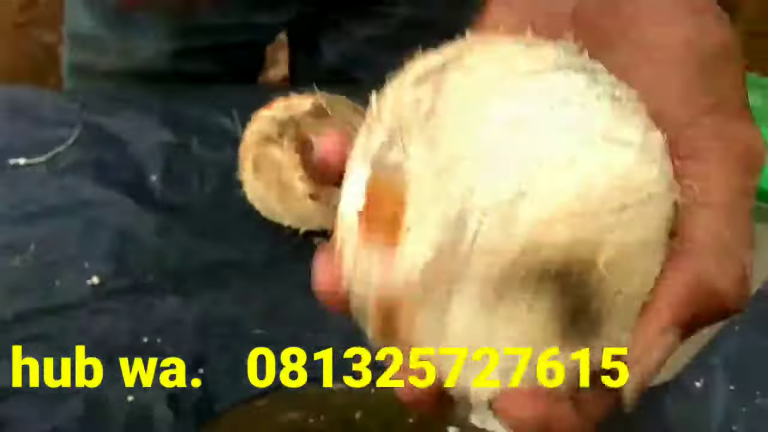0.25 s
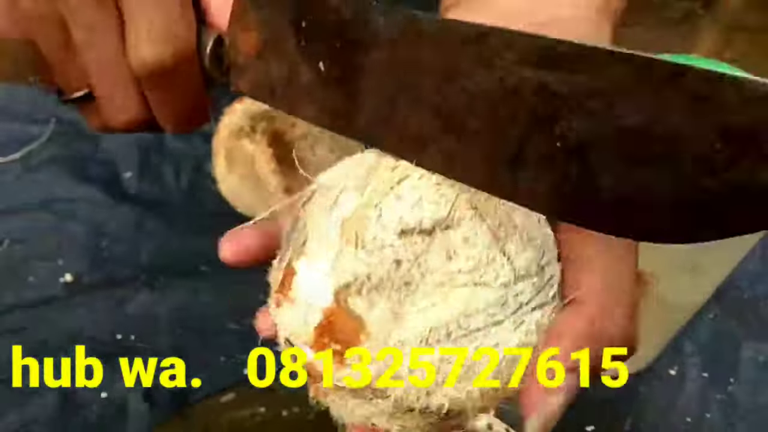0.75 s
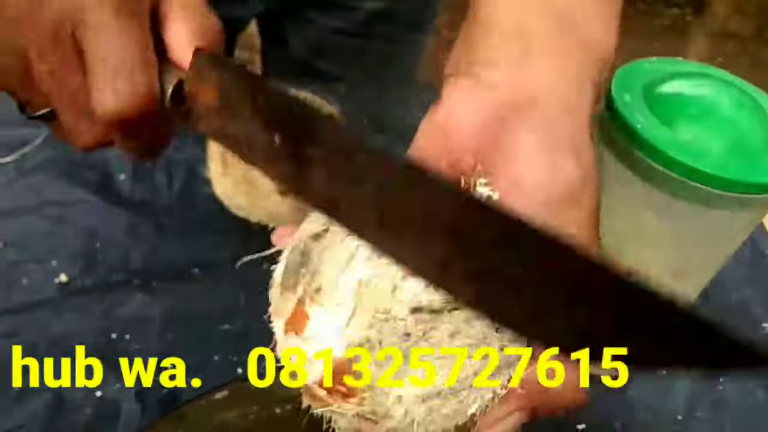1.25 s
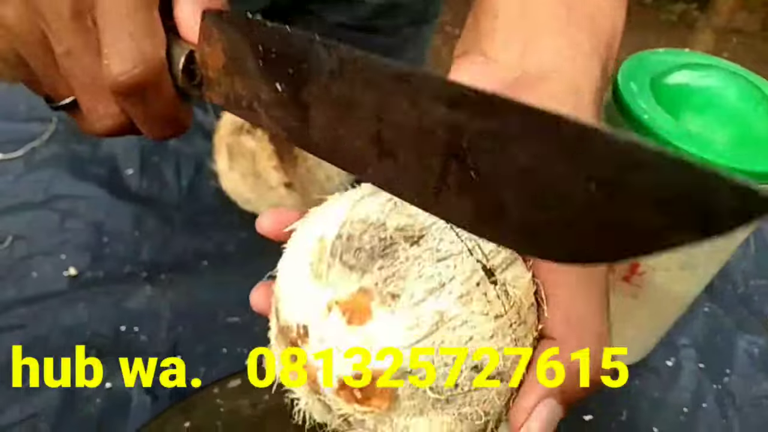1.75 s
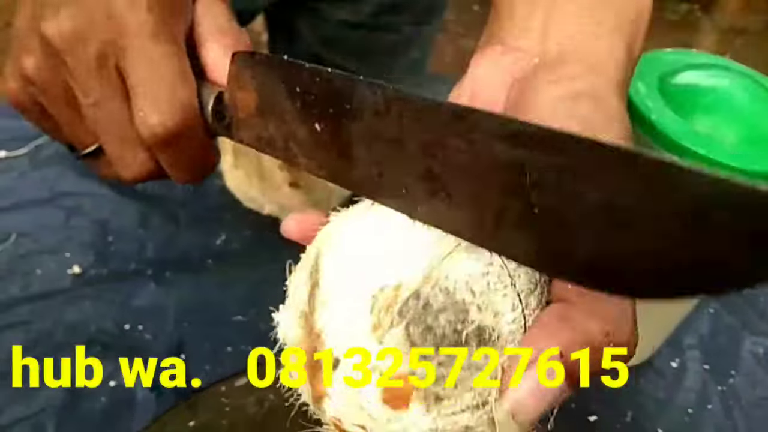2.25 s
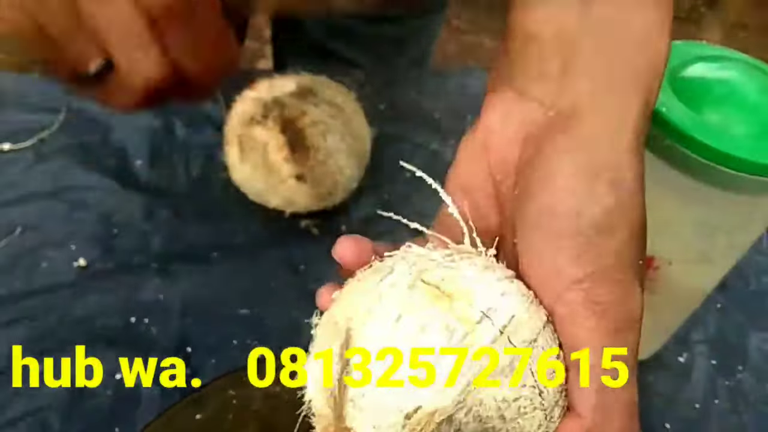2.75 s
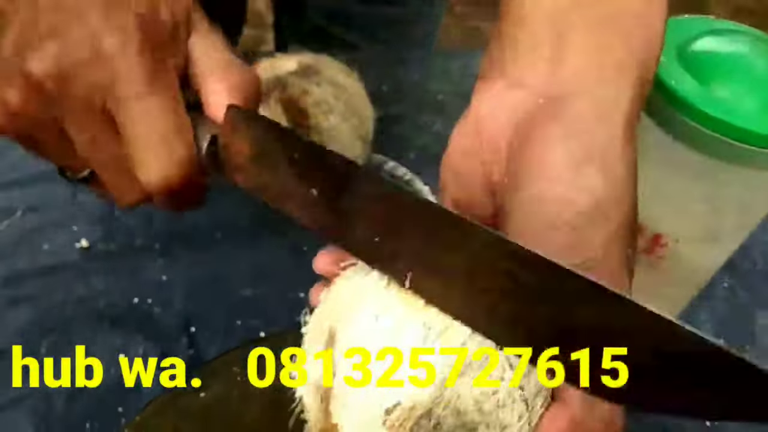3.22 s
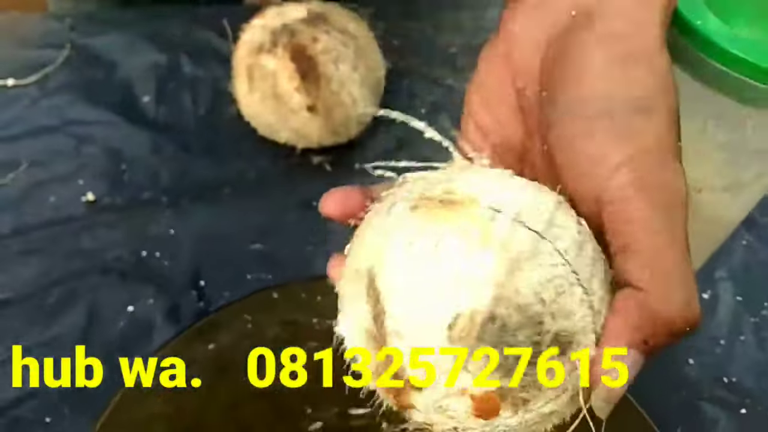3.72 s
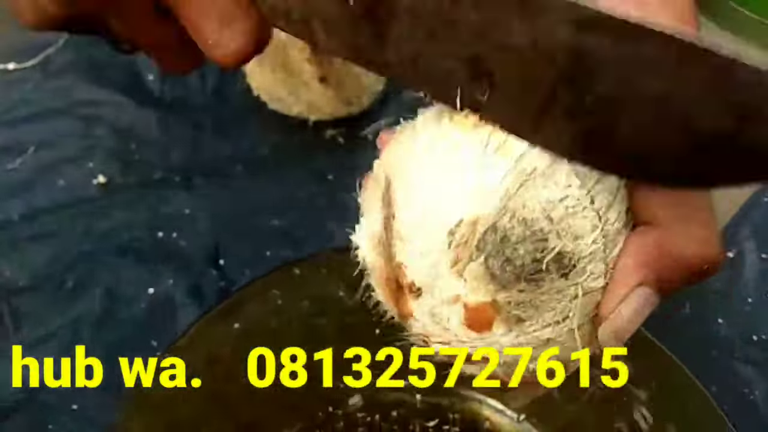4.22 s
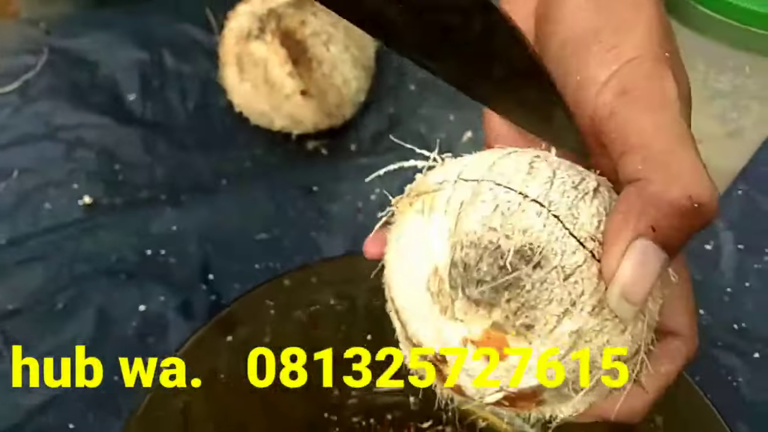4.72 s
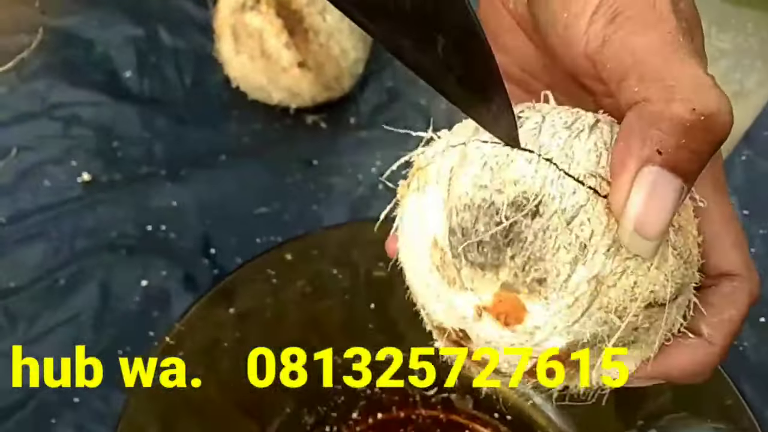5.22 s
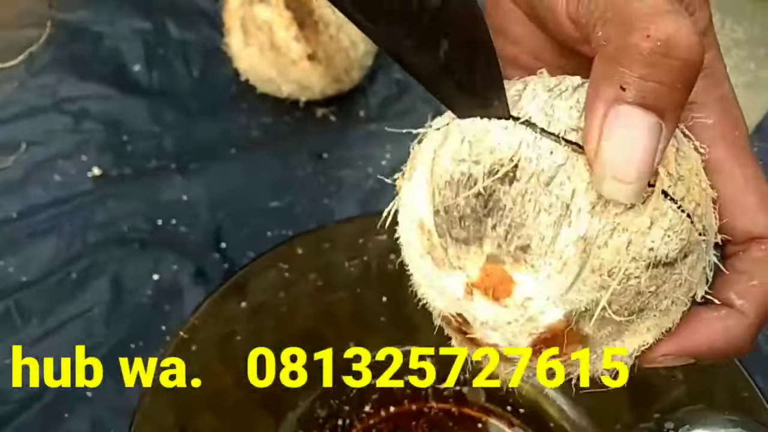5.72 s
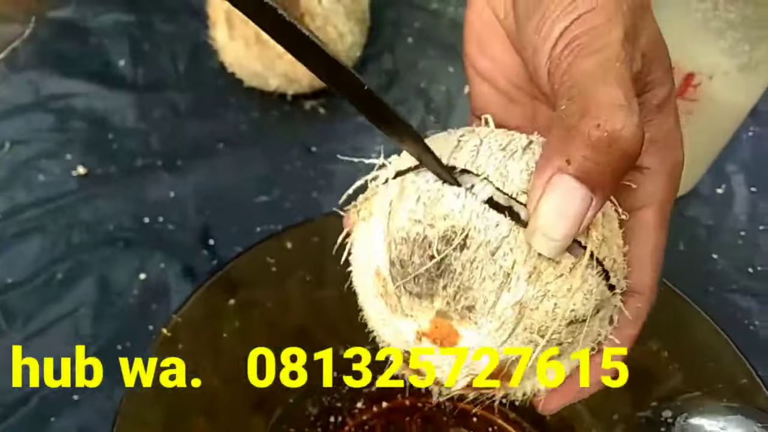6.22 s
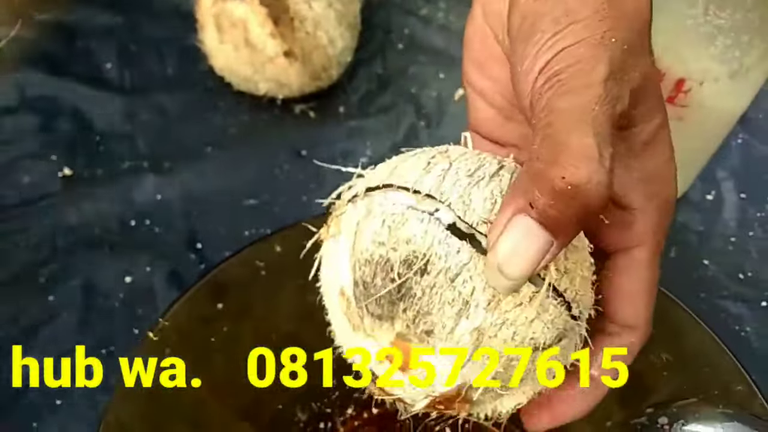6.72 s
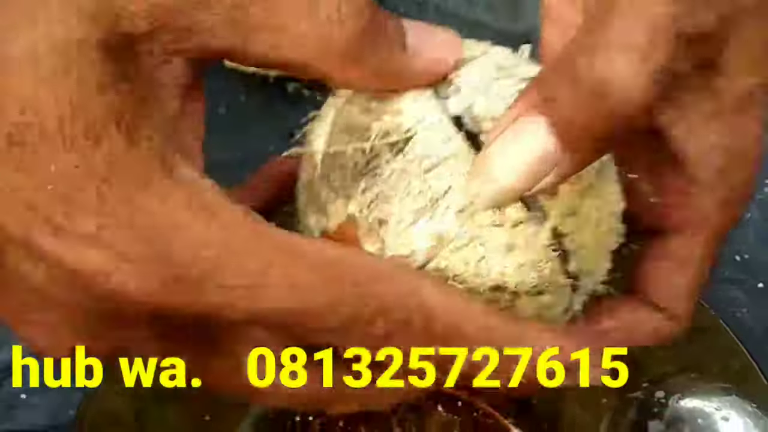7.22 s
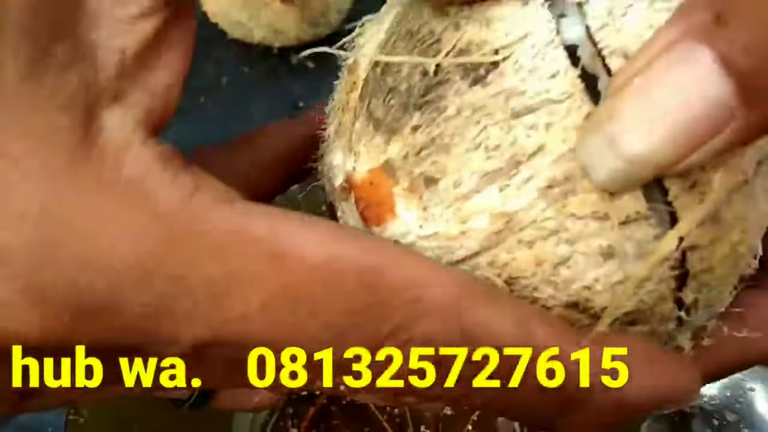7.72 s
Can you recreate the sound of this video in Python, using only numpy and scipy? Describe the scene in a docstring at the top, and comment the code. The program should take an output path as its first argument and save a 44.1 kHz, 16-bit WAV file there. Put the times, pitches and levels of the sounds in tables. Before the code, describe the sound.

A quiet open yard with low distant traffic, soft hiss and very faint wavering whistles. Close by, a machete knocks a husked coconut: a sharp crack at 0.1 seconds, a very loud, hollow one with ringing metal and yard echo at 0.45, a faint touch at 0.9, another huge blow at 1.3. A tiny metal chink follows at 1.46, with soft taps near 1.95 and 2.3. A quicker run of strong knocks comes at 2.75, 3.05 and 3.35, a last one at 4.35. The loudest distort slightly. From 5 to 6.4 dry fibres scratch, tick and rustle as the tip pries the crack. At 6.45 the shell gives a hollow double pop, then a short resonant grind to 6.7. At 7.0 the dropped blade thumps, slides with a bright, shrill metallic scrape and jingle, bounces at 7.2 and 7.5, and leaves faint rustling and yard rumble until 8.

```python
"""Sharp knocks ring out over a quiet yard: the back of a machete strikes a hand-held husked coconut. Each knock
is splintering noise, a hollow thud and ringing blade modes, with a noise tail from the yard. Fibre grains
rustle as the shell is turned and prised open; a small metal part chinks once early on; the dropped blade slides
and bounces. Two close microphones clip softly, and four loud blows swing their bias. Filtered noise makes
distant traffic; wavering tones and gliding whistles lie faintly behind."""
import sys
import numpy as np
from scipy import signal
from scipy.fft import rfft, irfft
from scipy.io import wavfile

SR = 44100
rng = np.random.default_rng(int(sys.argv[2]) if len(sys.argv) > 2 else 0)


def write(x):
    x = np.atleast_2d(x).T
    wavfile.write(sys.argv[1], SR, np.round(np.clip(x, -1, 1) * 32767).astype(np.int16))

N = 351036  # length in samples


def amp(db):
    """dB to gain."""
    return 10 ** (np.asarray(db) / 20)


def sides(pan_db):
    """Left and right gains whose mean is 1; positive pan_db leans left."""
    left = amp(pan_db)
    return np.array([[left], [1.]]) * 2 / (1 + left)


def rms_one(x):
    """Scale so that the mean of the channels has rms 1."""
    middle = np.mean(np.atleast_2d(x), axis=0)
    return x / np.sqrt(np.mean(middle ** 2) + 1e-20)


def in_time(rows):
    """Level columns as gains in time, silent outside the table's span."""
    start_s, *columns = np.transpose(rows)
    t = np.arange(N) / SR
    return [amp(np.interp(t, start_s, level_db, -200, -200)) for level_db in columns]


def at_hz(points, hz):
    """Read a table on a log-frequency axis."""
    table_hz, values = np.array(points)[:, 0], np.array(points)[:, 1]
    return np.interp(np.log(hz), np.log(np.maximum(table_hz, 1)), values)


def drift(rate):
    """Slow chance: random points, rate per second, of spread 1, joined by straight lines."""
    steps = rng.standard_normal(int(N / SR * rate) + 2)
    return np.interp(np.arange(N) / SR * rate, np.arange(len(steps)), steps)


# Likeness of the two microphones' noise, 1 alike to -1 opposed: pitch_hz [Hz], likeness [-1..1]
MIC_LIKENESS = [(60, 0.92), (240, 0.92), (950, 0.25), (3770, -0.0013), (15000, -0.71)]


def coloured(spectrum, pan, size=N, source=None):
    """Stereo noise with a spectrum, alike in the bass and partly opposed at the top; rms 1."""
    hz = np.maximum(np.fft.rfftfreq(size, 1 / SR), 1)
    mid, side = rfft(rng.standard_normal((2, size)) if source is None else source)
    alike = np.clip(at_hz(MIC_LIKENESS, hz), -1, 1)
    tilt = amp(at_hz(pan, hz) / 2)
    mid, side = mid * np.sqrt(1 + alike), side * np.sqrt(1 - alike)
    pair = np.array([(mid + side) * tilt, (mid - side) / tilt])
    return rms_one(irfft(amp(at_hz(spectrum, hz)) * pair, size))


def grains(per_s, spread_db):
    """Two rows of random clicks of uneven size."""
    loudness_db = spread_db * np.minimum(rng.exponential(1, (2, N)), 4)
    sizes = amp(loudness_db) * rng.standard_normal((2, N))
    return sizes * (rng.random((2, N)) < per_s / SR) + 1e-18


def resonate(x, peaks):
    """Parallel two-pole resonances of alternating sign, each with gain 1 on top before its level."""
    out = 0
    for k, (hz, width_hz, level_db) in enumerate(peaks):
        r = np.exp(-np.pi * width_hz / SR)
        poles = [1, -2 * r * np.cos(2 * np.pi * hz / SR), r * r]
        zeros = [(1 - r * r) / 2, 0, (r * r - 1) / 2]
        out = out + (-1) ** k * amp(level_db) * signal.lfilter(zeros, poles, x)
    return out


def rings(modes, level_db, t):
    """Struck modes with chance strengths; a plate radiates with unlike phases to each side."""
    hz, mode_db, t60_s = np.transpose(modes)[:, :, None]
    strength_db = level_db + mode_db + rng.normal(0, 2, hz.shape)
    phases = rng.uniform(0, 2 * np.pi, (2, *hz.shape))
    decay = amp(strength_db - 60 * t / t60_s)
    return (decay * np.sin(2 * np.pi * hz * t + phases)).sum(axis=1)


FALL_POWER = 1.4  # 2 = bell-shaped fall, 1 = long tail


def swell(loudest_s, rise_s, fall_s):
    """A gain that is loudest at one moment: bell-shaped rise, trailing fall."""
    t = np.arange(0, N, 32) / SR
    rising = ((t - loudest_s) / rise_s) ** 2
    falling = (abs(t - loudest_s) / fall_s) ** FALL_POWER
    gain = np.exp(-np.where(t < loudest_s, rising, falling))
    return np.interp(np.arange(N) / SR, t, gain)


# Colour of the open yard and far traffic: pitch_hz [Hz], level_db [relative dB per Hz]
YARD_COLOUR = [(12, -47), (20, -13), (37, -2), (113, -4.5), (270, -23.5), (301, -16), (328, -27.5),
               (513, -25.5), (660, -25), (738, -35), (897, -24), (1090, -34.5), (2080, -34.5),
               (4200, -32.5), (6500, -41), (10500, -30.5), (13500, -33.5), (16000, -37)]
# Where the yard lies between the microphones: pitch_hz [Hz], pan_db [left-right dB]
YARD_PAN = [(60, 0), (240, -0.5), (950, -0.5), (3770, -6), (15000, 0)]
# Far tones: pitch_hz [Hz], level_db [dB before FAR_LIFT_DB]
FAR_TONES = [(299, -74.5), (500, -78), (860, -78)]
# Faint far whistles: start_s, end_s [s], start_hz, end_hz [Hz], level_db [dB before FAR_LIFT_DB]
FAR_WHISTLES = [(0.204, 0.464, 6260, 6430, -71), (1.094, 1.28, 6320, 6100, -79),
                (1.803, 2.253, 5780, 5750, -75.5), (4.88, 5.096, 1476, 1370, -66),
                (5.18, 5.414, 1428, 1276, -70.5), (6.863, 6.949, 1257, 1077, -61),
                (6.879, 6.916, 2440, 2190, -65), (7.579, 7.716, 594, 627, -60.5)]
YARD_DB, FAR_LIFT_DB = -52, 1.5


def yard():
    """Far traffic rumble and hiss as shaped noise, with wavering tones and faint gliding whistles."""
    t = np.arange(N) / SR
    out = amp(YARD_DB + 0.93 * drift(1.0)) * coloured(YARD_COLOUR, YARD_PAN)
    for hz, level_db in FAR_TONES:
        out += amp(level_db + FAR_LIFT_DB + 3.4 * drift(12.0)) * np.sin(2 * np.pi * hz * t)
    for start_s, end_s, start_hz, end_hz, level_db in FAR_WHISTLES:
        arch = np.sin(np.pi * np.clip((t - start_s) / (end_s - start_s), 0, 1)) ** .5
        glide_hz = np.interp(t, [start_s, end_s], [start_hz, end_hz])
        pitch_hz = glide_hz * (1 + 0.0064 * drift(22))
        gain = amp(level_db + FAR_LIFT_DB + 3.0 * drift(28)) * arch
        out += gain * np.sin(2 * np.pi * np.cumsum(pitch_hz) / SR)
    return out


# Close scuffs of hands and blade tip on the fibres:
# loudest_s, rise_s, fall_s [s], hiss_db [dB], dull_db [dB relative to the hiss]
SCUFFS = [(.01, 0.03, 0.021, -60, -14), (1.011, 0.051, 0.043, -58.5, -19), (1.74, .032, .054, -61.5, -5),
          (1.96, .005, .012, -55.5, -9.5), (2.149, .019, 0.048, -60.5, -16), (2.33, .03, .018, -59, -12.5),
          (2.459, .017, 0.0088, -59.5, -11), (3.0, .02, 0.02, -62.5, -15.5), (3.6, 0.078, 0.071, -59, -29),
          (3.871, .14, 0.12, -60.5, -11), (4.521, .038, 0.12, -57, -16.5), (4.75, 0.11, 0.2, -62, -12),
          (5.133, 0.019, 0.016, -59, -7), (5.2, .029, 0.038, -55, -15), (5.281, 0.014, 0.015, -58, -13),
          (5.386, 0.011, 0.05, -40, -21), (5.61, 0.076, 0.059, -61.5, -15), (5.712, .04, 0.02, -44, -3),
          (5.858, .01, 0.031, -46, -30.5), (6.001, 0.064, .046, -59, -19), (6.07, 0.05, 0.029, -52, -19),
          (6.151, .034, 0.045, -53.5, -17.5), (6.24, 0.038, .031, -54.5, -15),
          (6.381, 0.063, 0.2, -62, -12), (6.611, 0.045, 0.023, -45.5, -10), (6.7, 0.039, .1, -62, -3),
          (6.891, .019, 0.067, -58, -4.5), (7.68, 0.12, 0.21, -66, -1)]
# Colour of the bright fibres: pitch_hz [Hz], level_db [relative dB per Hz]
RUSTLE_HISS = [(880, -59), (1500, -20), (2040, -14), (2940, -4), (6060, -8), (6830, -7.5), (10900, 6.5),
               (14900, -5), (16000, -12)]
# Colour of the gripped shell: pitch_hz [Hz], level_db [relative dB per Hz]
RUSTLE_DULL = [(120, -32.5), (200, -22.5), (730, -5.5), (2310, -25), (3810, -11), (6000, -30),
               (7800, -72.5), (13200, -120)]


def rustle():
    """Dense fibre grains in short swells, with a duller noise part when the shell is gripped."""
    hiss, dull = sum(amp([[hiss_db], [hiss_db + dull_db]]) * swell(*shape)
                     for *shape, hiss_db, dull_db in SCUFFS)
    bright = coloured(RUSTLE_HISS, YARD_PAN, source=grains(5400, spread_db=2.5))
    flicker = amp(2.1 * drift(48))
    return flicker * (hiss * bright + dull * coloured(RUSTLE_DULL, YARD_PAN))


# The opened shell grinds close by: start_s [s], level_db [dB]
GRIND_LEVEL = [(6.48, -57), (6.54, -60), (6.57, -46.5), (6.615, -37), (6.632, -67), (6.675, -53),
               (6.7, -76)]
MOUTH_HZ, MOUTH_WIDTH_HZ = 1030, 70


def grind():
    """Shell edges slip in random clicks and excite the air in the open mouth."""
    slips = grains(1500, spread_db=1.0)[0]
    mouth = [(MOUTH_HZ, MOUTH_WIDTH_HZ, 0), (3450, 150, -6), (4500, 300, -12)]
    hum = rms_one(resonate(slips, mouth))
    return in_time(GRIND_LEVEL)[0] * hum * sides(-13.5)


# Surges of the sliding blade: start_s [s], level_db [dB of its high ring]
SLIDE_SURGES = [(7.03, -57), (7.046, -30.5), (7.094, -23.5), (7.15, -26), (7.196, -56), (7.21, -30),
                (7.25, -32.5), (7.258, -23.5), (7.28, -25), (7.3, -45), (7.314, -32), (7.382, -50),
                (7.39, -37.5), (7.46, -60.5), (7.494, -44), (7.55, -82)]
# High blade resonances: pitch_hz, width_hz [Hz], level_db [relative dB]
SLIDE_RING = [(9000, 100, -2), (9370, 110, 0), (9610, 78, 4), (10400, 150, -4), (10730, 75, 0.5),
              (11200, 140, -1.5), (11770, 130, -6), (12700, 120, -10.5)]
# Colour of the lower scrape: pitch_hz [Hz], level_db [relative dB per Hz]
SLIDE_MID = [(300, -30), (600, 2), (1500, 4), (3000, 12.5), (4800, 6), (5800, -17), (8000, 5.5),
             (9000, -58)]
# Singing notes, each filter passed twice: pitch_hz, width_hz [Hz, one pass], level_db [dB, one pass]
SLIDE_NOTES = [(2008, 20, -1), (5190, 170, 0)]
# Place between the microphones: pitch_hz [Hz], pan_db [left-right dB]
SLIDE_PAN = [(60, -3), (380, 0), (2380, -10), (15000, -38)]
# Low bumps from the ground: loudest_s, fall_s [s], level_db [dB]
GROUND_BUMPS = [(7.03, 0.047, -11), (7.151, 0.088, -31.5), (7.383, 0.037, -32), (7.48, 0.069, -44)]
# Colour of those bumps: pitch_hz [Hz], level_db [relative dB per Hz]
BUMP_COLOUR = [(8.8, -30), (15, 6.5), (38, 5), (76, -8), (249, -13), (402, -31), (469, -27), (900, -30),
               (1170, -39), (1980, -120)]
GROUND_RISE_S = 0.0055
BODY_DB, BODY_FOLLOWS = -32.5, 0.56  # the lower ring follows the surges by this share of their dB


def slide():
    """Grit under the sliding blade rings its dense high modes; the ground passes low bumps."""
    bright = in_time(SLIDE_SURGES)[0]
    mid = amp(BODY_DB) * bright ** BODY_FOLLOWS
    bumps = sum(amp(level_db) * swell(s, GROUND_RISE_S, fall_s) for s, fall_s, level_db in GROUND_BUMPS)
    grit = grains(8000, spread_db=2.5)

    band = signal.butter(10, [8800, 15200], "band", fs=SR, output="sos")
    ringing_grit = rms_one(resonate(grit, SLIDE_RING)) + amp(-5.0) * rms_one(grit)
    ring = signal.sosfilt(band, ringing_grit) * sides(-11.0)

    # two passes give steep skirts, so the notes sing
    twice = sum(resonate(resonate(grit, [note]), [note]) for note in SLIDE_NOTES)
    notes = rms_one(twice * sides(-5.0))
    scrape = coloured(SLIDE_MID, SLIDE_PAN, source=grains(2500, spread_db=2.0))
    body = amp(3.4 * drift(70)) * scrape + amp(3.0) * notes

    high = bright * amp(3.0 * drift(80)) * rms_one(ring)
    return high + mid * body + bumps * coloured(BUMP_COLOUR, SLIDE_PAN)


# One chink of a small metal part: start_s [s], level_db [dB]
JINGLE = (1.462, -27)
# Its modes: pitch_hz [Hz], level_db [relative dB], t60_s [s]
JINGLE_MODES = [(4320, -5.5, 0.048), (8350, -16, 0.16), (9550, -4, 0.09), (10840, -26, 0.088),
                (11100, -6.5, 0.11), (11900, 5, 0.031), (13500, 0.5, 0.045), (14600, -6, 0.073)]


def jingle():
    """A short bright chink: a small metal part's modes ring once and die away."""
    start_s, level_db = JINGLE
    out, t, at = np.zeros((2, N)), np.arange(SR // 4) / SR, round(start_s * SR)
    out[:, at:at + len(t)] = rings(JINGLE_MODES, level_db, t) * sides(-1.0)
    return out


# Bands of the contact noise: low_hz, high_hz [Hz]
CRACK_BANDS = [(150, 600), (600, 1800), (2200, 5600), (6000, 8500), (8500, 16000)]
# Left-right likeness of each band: likeness [0..1]
CRACK_ALIKE = [1, .9, 0.17, .35, .3]
# Tilt of a blow between the microphones: pitch_hz [Hz], pan_db [dB added to the blow's pan_db]
BLOW_PAN = [(200, 5), (700, 4.5), (2400, -1), (4400, -6), (9000, 1)]
CRACK_T60_PER_CONTACT = 4.8  # decay time as a multiple of contact time


def contact_noise(since, t, contact_s, band_db, pan_db, filters):
    """A burst of splintering noise, held while the parts touch, coloured band by band."""
    out, short = np.zeros(since.shape), SR // 8
    since, t = since[:, :short], t[:short]
    shared = np.interp(since, t, rng.standard_normal(short))
    own = rng.standard_normal((2, short))
    fall = amp(-60 * np.maximum(since - contact_s, 0) / (CRACK_T60_PER_CONTACT * contact_s))
    burst = fall * (1 - np.exp(-since / 0.00016))
    alikes = np.clip(CRACK_ALIKE, 0, 1)
    for sos, (low, high), level_db, alike in zip(filters, CRACK_BANDS, band_db, alikes):
        band_pan_db = pan_db + at_hz(BLOW_PAN, np.sqrt(low * high))
        gain = amp(level_db) / np.sqrt(2 * (high - low) / SR) * sides(band_pan_db)
        noise = np.sqrt(alike) * shared + np.sqrt(1 - alike) * own
        out[:, :short] += gain * signal.sosfilt(sos, burst * noise + 1e-18)
    return out


# Blade knocks on the shell, later bounces on the ground: start_s, contact_s [s], crack_db [dB],
# bass_db, treble_db [dB relative to the crack], thud_hz [Hz], thud_db [dB before THUD_LIFT_DB],
# ring_db of the four blade families [4 columns, dB], tail_db [dB before TAIL_LIFT_DB], pan_db [left-right dB]
BLOWS = [(0.116, 0.002, -8.5, -7, -3, 700, -27, -22.5, -30.5, -37, -28.5, -54, -5.5),
         (0.145, 0.0039, -48, 11, -.5, 870, -47, -58.5, -72, -67, -58.5, -71, -9),
         (0.4431, 0.0034, 1.5, -26.5, -1.5, 516, -21.5, -27, -45.5, -35, -25, -29.5, -4),
         (0.8915, 0.0028, -34, 1.5, 1, 950, -49, -47.5, -48, -62, -67, -70.5, -10),
         (1.2909, 0.0044, -1.5, -17, 3, 762, -15.5, -44.5, -40, -10, -33, -33, -5),
         (1.9457, 0.0018, -45.5, 14, 5, 220, -32.5, -48, -59, -49, -49, -63.5, -8.5),
         (2.2688, 0.002, -30.5, 9, 5, 225, -41, -49, -60.5, -75, -42, -68.5, -9),
         (2.7485, 0.0052, -11, -7.5, 7, 155, -30.5, -44.5, -49, -41.5, -18, -44, -5.5),
         (3.0597, 0.0053, -9, -7.5, 7, 600, -31, -55, -45.5, -19.5, -53, -41.5, -4),
         (3.338, 0.0054, -9, -13, 7.5, 195, -34, -52.5, -50.5, -13.5, -45, -44, -5.5),
         (3.7319, 0.0036, -39.5, -25, 3.5, 1157, -63, -30, -64, -63, -61, -68, -9),
         (4.357, 0.0051, -9.5, -11.5, 3, 174.8, -28, -52.5, -51, -58, -48.5, -47, -6),
         (6.4515, 0.0031, -18, -13, 6.5, 1022, -20.5, -59, -55, -43, -43.5, -53, -8.5),
         (6.467, 0.0026, -24.5, -20.5, 4.5, 1062, -33.5, -64, -66.5, -56, -52, -67.5, -6.5),
         (7.0197, 0.0055, -35, 9, -4, 162, -27, -30.5, -51, -51, -53, -40.5, -9),
         (7.047, 0.014, -36, 10.5, 0, 250, -26.5, -38, -25.5, -39, -36, -42.5, -8),
         (7.206, 0.012, -52, -16, 11.5, 214, -65, -65, -27.5, -42, -38, -70, -9),
         (7.4775, 0.0081, -62, -21, 6, 179, -54, -50.5, -52, -55, -60, -66, -6)]
# Four families of blade modes that a blow excites together: pitch_hz [Hz], level_db [relative dB], t60_s [s]
BLADE = [
    [(1650, -20, .1), (2223, -13, .11), (2690, -1, .075), (2977, -5, .09), (3200, -3, .085),
     (3693, -11, .11), (4107, -14, .11), (4590, -14, .1), (5390, -24, .1)],
    [(7460, -16, .13), (9270, 0, .24), (14680, -24, .12)],
    [(5915, -24, .12), (9985, 0, .125), (13850, -30, .12)],
    [(10730, -12, .13), (11215, 0, .13), (11670, -16, .14), (13550, -22, .15)],
]
# Light ticks of fibres and blade tip: start_s [s], level_db [dB], treble_db [relative dB], pan_db [left-right dB]
TICKS = [(1.0868, -47.5, -3, -19), (1.4634, -51.5, 27, -7), (1.577, -58.5, 11.5, -5),
         (1.667, -48, 1.5, -25), (3.5094, -61.5, 17.5, -13), (5.0068, -53, 14, -10),
         (5.552, -38.5, 8.5, -15), (5.5863, -65, 21.5, 6), (5.759, -51, 16.5, 6), (5.7876, -59, 13, -1),
         (5.805, -42, 2, 12), (5.8406, -39, 15, 12), (6.018, -58, 15, -2), (6.138, -59.5, 14, -4),
         (6.236, -61.5, 12, -4), (7.582, -45.5, -2, -19)]
# Level of a knock, then of a tick, in the five contact bands: level_db [relative dB]
CRACK_SHAPE_DB = [0.5, -1, 0.5, -6.5, -0.06]
TICK_SHAPE_DB = [-22.5, -13.5, 0.5, -5.5, 1]
# How far the five bands follow bass_db, then treble_db: share [0..1]
BASS_SHARE = [1, 0.59, 0, 0, 0.029]
TREBLE_SHARE = [0.04, 0.015, 0.013, 0.36, 0.95]
# Colour of the yard's tail: pitch_hz [Hz], level_db [relative dB per Hz]
TAIL_COLOUR = [(250, -24), (400, -3), (900, -6.5), (1800, -7), (3000, -1.5), (4600, -2), (6500, -12.5),
               (8300, -3.5), (10500, 3), (13000, -13), (15300, -22.5), (16000, -60.5)]
TAIL_T60_S, TAIL_LIFT_DB = 0.19, 10.5
FAR_TAIL_T60_S, FAR_TAIL_DB = 0.68, -21  # later echoes from farther walls, relative to the tail
THUD_T60_S, THUD_LIFT_DB = .04, 13.0
TICK_CONTACT_S, TICK_TAIL_DB = 0.0026, -28.5  # tail relative to the tick, before TAIL_LIFT_DB
LEFT_LAG_S = .00015  # the left microphone is farther from the shell
CRACK_TOP_HZ = 11600  # treble limit of the contact noise


def blows():
    """Each knock is splintering noise, a hollow thud and the blade's ring, a tick only noise; the yard adds a tail."""
    size, lead_s = SR // 2, .001
    out, t = np.zeros((2, N + size)), np.arange(size) / SR
    clumps = amp(2 * drift(200))  # echoes arrive unevenly
    tail_noise = clumps * coloured(TAIL_COLOUR, YARD_PAN)
    dying = amp(-60 * t / TAIL_T60_S) + amp(FAR_TAIL_DB - 60 * t / FAR_TAIL_T60_S)
    since = np.maximum(t - lead_s - np.array([[LEFT_LAG_S], [0]]), 0)  # time since contact at each side
    dull = signal.butter(3, CRACK_TOP_HZ, fs=SR, output="sos")
    filters = [np.vstack([dull, signal.butter(2, edges, "band", fs=SR, output="sos")])
               for edges in CRACK_BANDS]

    def add(sound, start_s, tail_db):
        """Place a sound and the yard's tail, which builds up over a few milliseconds."""
        at = round((start_s - lead_s) * SR)
        tail = np.take(tail_noise, at + np.arange(size), axis=1, mode="wrap")
        tail_gain = amp(tail_db + TAIL_LIFT_DB) * dying * (1 - np.exp(-since / 0.0047))
        out[:, at:at + size] += sound + tail_gain * tail

    for (start_s, contact_s, crack_db, bass_db, treble_db, thud_hz, thud_db,
         *ring_db, tail_db, pan_db) in BLOWS:
        tilt_db = np.dot([bass_db, treble_db], [BASS_SHARE, TREBLE_SHARE])
        band_db = crack_db + np.array(CRACK_SHAPE_DB) + tilt_db
        crack = contact_noise(since, t, contact_s, band_db, pan_db, filters)
        thud_gain = amp(thud_db + THUD_LIFT_DB - 60 * since / THUD_T60_S)
        thud = thud_gain * -np.sin(2 * np.pi * thud_hz * since) * sides(pan_db + at_hz(BLOW_PAN, thud_hz))
        ring = sum(rings(modes, db, t) for modes, db in zip(BLADE, ring_db))
        ring = (1 - np.exp(-since / 0.00014)) * sides(pan_db) * ring
        add(crack + thud + ring, start_s, tail_db)
    for start_s, tick_db, treble_db, pan_db in TICKS:
        band_db = tick_db + np.array(TICK_SHAPE_DB) + treble_db * np.array(TREBLE_SHARE)
        tick = contact_noise(since, t, TICK_CONTACT_S, band_db, pan_db, filters)
        add(tick, start_s, tick_db + TICK_TAIL_DB)
    return out[:, :N]


def scene():
    """Everything the microphones receive."""
    return yard() + rustle() + grind() + slide() + jingle() + blows()


# Overloads that shift the microphones' bias: start_s [s], left_step, right_step [full scale 1, before the high-pass]
OVERLOADS = [(.445, .36, 2.9), (1.291, 1.63, 2.41), (3.063, 0.14, .55), (3.338, 0.044, 0.38)]
BIAS_RISE_S, BIAS_HZ = 0.0012, 4.35


def bias_swing():
    """Each listed overload steps the bias down; a two-pole high-pass swings it back past zero to settle."""
    steps = np.zeros((2, N))
    for start_s, left_step, right_step in OVERLOADS:
        since = np.maximum(np.arange(N) / SR - start_s, 0)
        steps -= np.outer([left_step, right_step], 1 - np.exp(-since / BIAS_RISE_S))
    return signal.sosfilt(signal.butter(2, BIAS_HZ, "high", fs=SR, output="sos"), steps)


CLIP, COUPLING_HZ, CUTOFF_HZ = .8, .2, 16300  # clip level [full scale 1], high-pass, top cut


def record(dry):
    """Bias swings, the amplifier clips, the coupling lets flat tops sag, the top is cut."""
    x = (dry + bias_swing()) / CLIP
    clipped = CLIP * x / (1 + x ** 8) ** (1 / 8)
    coupled = signal.sosfilt(signal.butter(1, COUPLING_HZ, "high", fs=SR, output="sos"), clipped)
    return signal.sosfilt(signal.cheby2(14, 80, CUTOFF_HZ, fs=SR, output="sos"), coupled)


dry = scene()
out = record(dry)
write(out)
```